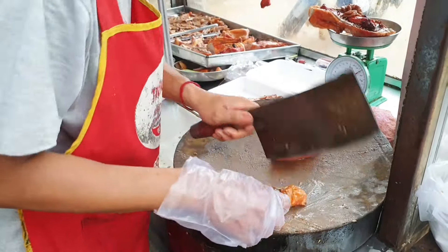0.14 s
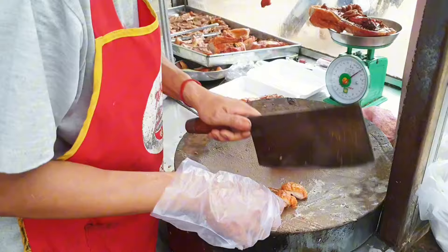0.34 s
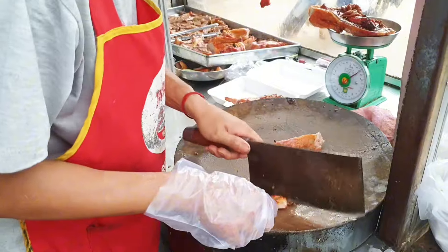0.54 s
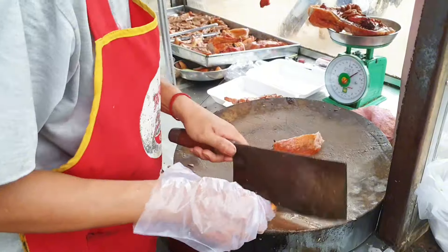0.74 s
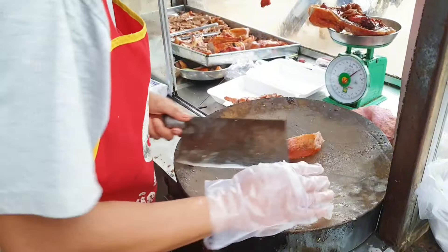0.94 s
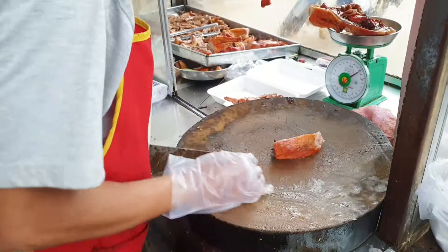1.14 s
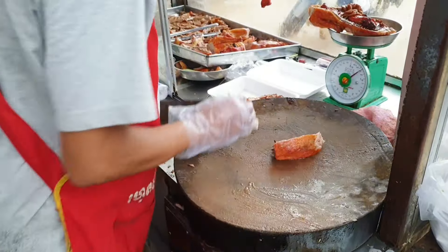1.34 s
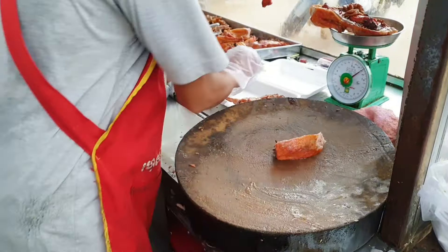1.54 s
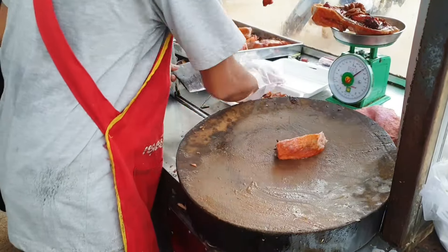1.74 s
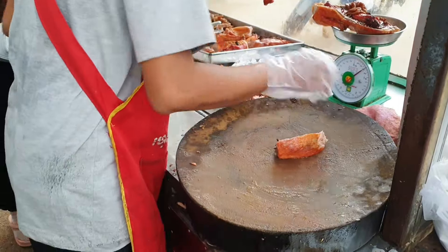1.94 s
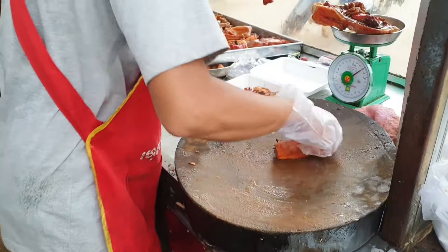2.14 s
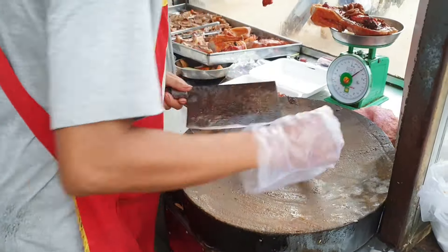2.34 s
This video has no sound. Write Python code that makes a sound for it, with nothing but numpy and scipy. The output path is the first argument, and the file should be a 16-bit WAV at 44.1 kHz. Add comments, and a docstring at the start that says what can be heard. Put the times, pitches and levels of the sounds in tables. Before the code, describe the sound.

Three solid cleaver chops crunch through roast meat on a thick wooden block, close up; then a scrape and plastic glove rustle, a brief clatter on a steel tray, and soft handling over low street rumble.

```python
"""A soft hollow tap and faint handling; a cleaver chops roast meat three times on a wooden block, close by.
A faint whistle; the blade scrapes the pieces up as a plastic glove rustles and snaps, to the end.
The cleaver clatters onto a steel tray and settles; two faint whistles follow.
Throughout: street rumble and hiss. Blows are modes and noise, the rest is shaped noise with a few modes.
The stall's walls give chops and clatter a short echo; the street gives the chops a long one."""
import sys
import numpy as np
from scipy import signal
from scipy.fft import rfft, irfft, next_fast_len
from scipy.io import wavfile
from scipy.ndimage import map_coordinates

SR = 44100
rng = np.random.default_rng(int(sys.argv[2]) if len(sys.argv) > 2 else 0)


def boost_factor(decibels):
    """Convert a level in decibels to a linear amplitude factor."""
    exponent = np.asarray(decibels, float) / 20
    return 10 ** exponent


def wav_record(signal):
    """Record a signal, one row per channel, as 16-bit PCM in the file named by sys.argv[1]."""
    frames = np.transpose(np.atleast_2d(signal))
    bounded = np.clip(frames, -1, 1)
    # unit amplitude maps onto the largest positive 16-bit level
    quanta = np.round(bounded * 32767).astype(np.int16)
    wavfile.write(sys.argv[1], SR, quanta)


N = 110250

# street noise spectrum: f/Hz, relative level/dB
STREET_SPECTRUM = [(18, -11), (30, -8), (104, 2.5), (160, -8.5), (420, -23), (1000, -24), (2000, -25),
                   (5440, -31.5), (8000, -33), (15800, -39.5)]
# left-right likeness of ambient sounds: f/Hz, likeness/1
AMBIENT_LIKENESS = [(60, 0.87), (250, 0.89), (700, 0.19), (2000, 0.045)]
# left-right likeness of the echoes: f/Hz, likeness/1
ECHO_LIKENESS = [(300, 0.87), (700, 0.53), (3000, 0.15)]
# faint narrow whistles: start/s, length/s, f/Hz, level/dB
WHISTLES_TABLE = [(0.85, 0.25, 2200, -56), (2.212, 0.045, 4020, -54), (2.235, 0.075, 2217, -54)]
# hand movements: peak/s, half-length scale/s, glove crinkle/dB, drag/dB, drag pitch/Hz
HAND_MOVES = [(0.928, 0.045, -47, -37.5, 430), (1.005, 0.022, -36.5, -53, 700),
              (1.06, 0.049, -42.5, -39, 230), (1.177, 0.072, -46.5, -49.5, 2200),
              (1.697, 0.043, -44, -44.5, 1850), (1.785, 0.047, -56, -48.5, 1390),
              (0.107, 0.027, -55.5, -53.5, 2200), (1.887, 0.019, -50.5, -55.5, 2200),
              (2.167, 0.1, -52, -45.5, 278), (2.379, 0.073, -48.5, -45, 2270)]
# thin plastic glove spectrum: f/Hz, relative level/dB
GLOVE_SPECTRUM = [(1500, -8), (3000, -14), (5200, -1), (8000, -10.5), (12000, -7.5), (16000, -24.5)]
# glove snaps: t/s, level/dB
GLOVE_SNAPS = [(1.4825, -35.5), (2.2643, -34.5), (2.4707, -38)]
# soft hollow taps: t/s, f/Hz, level/dB
HOLLOW_TAPS = [(0.085, 305, -36.5), (1.685, 717, -35.5), (2.478, 540, -39)]
# decay of the echo off the stall's walls: f/Hz, t60/s
STALL_DECAY = [(100, 0.8), (1000, 0.11), (10000, 0.34)]
# decay of the street's echo: f/Hz, t60/s
STREET_DECAY = [(100, 1.15), (10000, 1.09)]
# low modes of the stand under the block: f/Hz, level/dB, t60/s
STAND_MODES = [(67.1, -1.5, 0.35), (94.1, 5.5, 0.15), (141.5, -7, 0.45)]
# landings of the cleaver on the tray: t/s, level/dB, brightness/(dB/octave), rattle length scale/s
TRAY_LANDINGS = [(2.0756, -34.5, -0.5, 0.001), (2.1006, -24.5, -1, 0.0054), (2.1356, -29, 3.5, 0.036)]
# tray modes: f/Hz, level/dB, t60/s
TRAY_MODES = [(267, -3.5, 0.12), (650, 0, 0.12), (959.4, -6.5, 0.14), (1384, -2, 0.044), (2200, 1, 0.022),
              (2484, -6, 0.18), (2787, -2.5, 0.052), (3910, -5, 0.023), (5420, -18, 0.095)]
# chops: contact with wood/s, blow/dB, crust crunch/dB, pitch favoured by the struck spot/Hz,
# fall-off away from it/(dB/octave)
CHOP_BLOWS = [(0.2339, -12, -15.5, 290, 2), (0.493, -11.5, -21.5, 697, 1.72), (0.7283, -15.5, -7, 579, 3.5)]
# block modes: f/Hz, level/dB, t60/s
BLOCK_MODES = [(237.2, -16.5, 0.61), (274.2, 6, 0.056), (563, 6, 0.059), (663, -9, 0.16), (756, -30, 0.19),
               (963.3, -9, 0.19), (1237, -10, 0.087), (1500, -1.5, 0.068), (1646, 1, 0.034)]
# dense small modes of wood and blade: f/Hz, relative level/dB
KNOCK_SPECTRUM = [(88, -8), (150, -9), (566, -6), (888, -8), (1690, -13.5), (2020, -17), (16000, -31)]
# their decay: f/Hz, t60/s
KNOCK_DECAY = [(200, 0.26), (1000, 0.12), (12000, 0.12)]
# crust crunch spectrum: f/Hz, relative level/dB
CRUNCH_SPECTRUM = [(1500, -30), (2800, -24), (3950, 1), (9500, -4.5), (13800, -4), (16000, -7.5)]
# port imbalance: f/Hz, left over right/dB
PORT_BALANCE = [(60, -4.5), (700, -2), (4400, -7), (15000, 2)]
# port phase: f/Hz, left lead/rad
PORT_PHASE = [(500, -0.11), (4000, -1.71)]

STREET_DB, STALL_DB, FAR_DB = -40.5, -6, -13
WHISTLE_WIDTH_HZ, DRAG_WIDTH_OCTAVES = 80, 1  # both 1/e half-widths
CRINKLES_PER_S, CRINKLE_SPREAD_DB, WOBBLE_DB, TAP_T60_S = 2500, 2, 1.5, 0.07
STAND_PEAK_S = 0.03074  # modes pull together this long after the blow
TRAY_NOISE_DB, LANDING_DB = -2, -24
TRAY_ATTACK_S, TRAY_BRIGHT_TOP_HZ = 0.00016, 2780  # brightness tilt is flat above this pitch
SETTLE_S, SETTLE_T60_S = 2.174, 0.14
CRUNCH_S, KNOCK_DB, RING_ATTACK_S = 0.0045, 11, 0.00046
MODE_SCATTER_DB = 2
FLUTTER_STEP_RAD, FLUTTER_PER_S, FLUTTER_HZ = 0.35, 90, 600  # flutter grows above this pitch
PORT_DIP_HZ, PORT_DIP_DB, PORT_DIP_WIDTH_HZ = 8600, -5.5, 1500
TOP_HZ = 15950


def unit(x):
    """Scaled to rms 1."""
    return x / np.sqrt(np.mean(x ** 2) + 1e-20)


def along(points, hz):
    """Interpolates (Hz, value) points on a log axis."""
    f, v = np.transpose(points)
    return np.interp(np.log(hz + 1), np.log(f + 1), v)


def filtered(x, response):
    """x times a complex response of frequency."""
    m = next_fast_len(x.shape[-1] + 8192)
    spectrum = rfft(x, m) * response(np.fft.rfftfreq(m, 1 / SR))
    return irfft(spectrum, m)[..., :x.shape[-1]]


def coloured(x, spectrum):
    """x through a (Hz, dB) spectrum, rms 1."""
    return unit(filtered(x, lambda hz: boost_factor(along(spectrum, hz))))


def wobble(knots_per_s):
    """Smooth random curve."""
    knots = rng.standard_normal(int(N * knots_per_s / SR) + 4)
    return map_coordinates(knots, [np.arange(N) * knots_per_s / SR])


def dying(t60s, size, channels=1):
    """Noise whose every frequency dies at its own speed."""
    hz, t, z = signal.stft(rng.standard_normal((channels, size)), SR, nperseg=128)
    t60_s = np.maximum(along(t60s, hz), .01)[:, None]
    return signal.istft(z * boost_factor(-60 * t / t60_s), SR, nperseg=128)[1][:, :size]


def widen(pair, likeness=AMBIENT_LIKENESS):
    """Mixes two unrelated signals to the likeness of the two ports."""
    def mid_side(hz):
        turn = np.arccos(np.clip(along(likeness, hz), -1, 1)) / 2
        return np.array([np.cos(turn), np.sin(turn)])
    mid, side = filtered(pair, mid_side)
    return np.array([mid + side, mid - side])


def ring(modes, colour_db, t, attack_s):
    """One strike on decaying modes; levels scatter, uneven contact wavers the phase, pressure falls first."""
    total = 0
    for hz, db, t60 in modes:
        level_db = db + colour_db(hz) + MODE_SCATTER_DB * rng.normal()
        walk = np.cumsum(rng.standard_normal(100))
        waver = FLUTTER_STEP_RAD * np.interp(t * FLUTTER_PER_S, np.arange(100), walk)
        phase = 2 * np.pi * hz * t + waver * max(1, hz / FLUTTER_HZ) ** .5
        total = total + boost_factor(level_db - 60 * t / t60) * np.sin(phase)
    return -total * (1 - np.exp(-t / attack_s))


def add(track, s, x):
    """Lays x on the track at s seconds."""
    at = round(s * SR)
    track[at:at + len(x)] += x[:len(track) - at]


def street():
    """Lumpy traffic rumble under a smooth hiss: one noise split near 250 Hz, each part wavering by itself."""
    noise = coloured(rng.standard_normal((2, N)), STREET_SPECTRUM)
    rumble = filtered(noise, lambda hz: 1 / (1 + (hz / 250) ** 4))
    hiss = noise - rumble
    rumble_gain = boost_factor(0.49 * wobble(10.15) + 0.7 * wobble(0.92))
    hiss_gain = boost_factor(0.38 * wobble(6.0))
    return boost_factor(STREET_DB) * widen(rumble * rumble_gain + hiss * hiss_gain)


def echo(x, t60s, delay_s):
    """Diffuse reflections: decaying noise tails, drawn anew for each quarter second of sound."""
    out, step = np.zeros((2, N + 2 * SR)), SR // 4
    for at in range(step // 2, N, step):
        tail = dying(t60s, size=SR, channels=2)
        wet = signal.fftconvolve(x[None, at:at + step], tail / np.linalg.norm(tail[0]), axes=1)
        out[:, at + int(delay_s * SR):][:, :wet.shape[1]] += wet
    return widen(out[:, :N], ECHO_LIKENESS)


def whistles():
    """Narrow unsteady noise bands that swell and fade."""
    t = np.arange(N) / SR
    out = np.zeros((2, N))
    for s, length, centre_hz, db in WHISTLES_TABLE:
        swell = np.sin(np.pi * np.clip((t - s) / length, 0, 1)) ** .5
        band = filtered(rng.standard_normal((2, N)),
                        lambda hz: np.exp(-((hz - centre_hz) / WHISTLE_WIDTH_HZ) ** 2))
        out += boost_factor(db) * swell * boost_factor(2 * WOBBLE_DB * wobble(39.66)) * widen(unit(band))
    return out


def glove_crinkle(swells):
    """Thin plastic buckles in dense random clicks over a rustle."""
    hits = rng.random((2, N)) < CRINKLES_PER_S / SR
    sizes = boost_factor(CRINKLE_SPREAD_DB * rng.exponential(size=(2, N)))
    clicks = hits * sizes * rng.choice([-1, 1], (2, N))
    rustle = coloured(unit(clicks) + rng.standard_normal((2, N)), GLOVE_SPECTRUM)
    return swells.sum(0) * boost_factor(WOBBLE_DB * wobble(54.4)) * rustle


def drag(swells, pitches_hz):
    """Rubbing: a noise band about each movement's own pitch."""
    rub = rng.standard_normal((2, N))
    out = np.zeros((2, N))
    for swell, centre_hz in zip(swells, pitches_hz):
        band = filtered(rub, lambda hz: np.exp(-(np.log2((hz + 1) / centre_hz) / DRAG_WIDTH_OCTAVES) ** 2))
        out += swell * unit(band)
    return boost_factor(WOBBLE_DB * wobble(28.72)) * out


def snaps_and_taps():
    """Snaps are short bursts of glove noise; each tap rings one mode."""
    out, t = np.zeros(N), np.arange(SR // 4) / SR
    for s, db in GLOVE_SNAPS:
        burst = coloured(rng.standard_normal(900), GLOVE_SPECTRUM)
        add(out, s, boost_factor(db - 60 * t[:900] / 0.011) * burst)
    for s, hz, db in HOLLOW_TAPS:
        add(out, s, ring([(hz, db, TAP_T60_S)], lambda hz: 0, t, attack_s=0.004))
    return out


def hands():
    """Each movement swells quickly and fades slower, driving crinkle and drag; snaps and taps stand apart."""
    t = np.arange(N) / SR
    s, half, glove_db, drag_db, drag_hz = np.transpose(HAND_MOVES)[:, :, None]
    swell = np.exp(-((t - s) / half / np.where(t < s, .7, 1.3)) ** 2)
    moving = glove_crinkle(boost_factor(glove_db) * swell) + drag(boost_factor(drag_db) * swell, drag_hz)
    return widen(moving) + snaps_and_taps()


def thump(t):
    """The stand's low modes swell, peak together and beat."""
    late = t - STAND_PEAK_S
    modes = sum(boost_factor(db - 60 * t / t60) * np.cos(2 * np.pi * hz * late) for hz, db, t60 in STAND_MODES)
    return np.clip(t / STAND_PEAK_S, 0, 1) ** 2 * modes


def clanks():
    """Each landing is a short rattle of contacts that rings the tray; the last also shakes the stand."""
    out, t = np.zeros(N), np.arange(SR // 3) / SR
    for s, db, tilt_db, length in TRAY_LANDINGS:
        contacts = rng.standard_normal(2500) * (rng.random(2500) < .03)
        rattle = np.exp(-(t[:2500] / length) ** 4) * contacts
        rattle[0] = 3  # sure first contact
        colour_db = lambda hz: tilt_db * np.log2(min(hz, TRAY_BRIGHT_TOP_HZ) / 500)
        body = ring(TRAY_MODES, colour_db, t, TRAY_ATTACK_S)
        spectrum = [(hz, level + colour_db(hz)) for hz, level in KNOCK_SPECTRUM]
        body += boost_factor(TRAY_NOISE_DB - 60 * t / 0.16) * coloured(rng.standard_normal(len(t)), spectrum)
        add(out, s, boost_factor(db) * signal.fftconvolve(rattle / np.linalg.norm(rattle), body))
    add(out, TRAY_LANDINGS[-1][0], boost_factor(LANDING_DB) * thump(t))
    return out


def chops():
    """Edge crunches the crust, meets the wood; the stand thumps late; the street throws back a wash."""
    blows, bare, t = np.zeros(N), np.zeros((2, N)), np.arange(SR) / SR
    for s, db, crunch_db, spot_hz, fall_db in CHOP_BLOWS:
        colour_db = lambda hz: -fall_db * np.minimum(abs(np.log2((hz + 1) / spot_hz)), 2)
        spot_level_db = along(KNOCK_SPECTRUM, spot_hz)
        shape = lambda hz: boost_factor(along(KNOCK_SPECTRUM, hz) - spot_level_db + colour_db(hz))

        crunch_swell = (t / CRUNCH_S) ** 2 * np.exp(-(t / CRUNCH_S) ** 3)
        crunch = coloured(rng.standard_normal((2, len(t))), CRUNCH_SPECTRUM)
        crunch = boost_factor(crunch_db) * crunch * crunch_swell

        knock = dying(KNOCK_DECAY, size=len(t))[0]
        knock = filtered(knock / knock[:441].std(), shape) * (1 - np.exp(-t / RING_ATTACK_S))
        block = ring(BLOCK_MODES, colour_db, t, RING_ATTACK_S)
        add(blows, s, boost_factor(db) * (block + boost_factor(KNOCK_DB) * knock + boost_factor(-fall_db / 2) * thump(t)))

        wash = dying(STREET_DECAY, size=len(t), channels=2)
        wash = widen(filtered(wash / wash[:, :441].std(), shape), ECHO_LIKENESS)
        wash = wash * (1 - np.exp(-t / 0.0068))
        for track, tail, crackle in zip(bare, wash, crunch):
            add(track, s, boost_factor(db + KNOCK_DB + FAR_DB) * tail)
            add(track, s - CRUNCH_S, crackle)  # crust breaks before the wood is met
    return blows, bare


def scene():
    """Near blows with their echoes, hands, whistles and street."""
    blows, bare = chops()
    hits = blows + clanks()
    # the cleaver lies flat and damps the tray; the fade covers all hits and their stall echo
    settle = boost_factor(-60 * np.clip(np.arange(N) / SR - SETTLE_S, 0, None) / SETTLE_T60_S)
    near = (hits + boost_factor(STALL_DB) * echo(hits, STALL_DECAY, delay_s=0.0056)) * settle
    return near + bare + hands() + whistles() + street()


def band_limit(x):
    """A steep low-pass at the top of the band."""
    return signal.sosfilt(signal.butter(12, 16660, fs=SR, output="sos"), x)


def record(dry):
    """Two phone ports differ in level and phase and share a treble dip; soft clip, band limit."""
    half = lambda hz: boost_factor(along(PORT_BALANCE, hz) / 2) * np.exp(.5j * along(PORT_PHASE, hz))
    dip = lambda hz: boost_factor(PORT_DIP_DB * np.exp(-((hz - PORT_DIP_HZ) / PORT_DIP_WIDTH_HZ) ** 2))
    ports = filtered(dry, lambda hz: dip(hz) * np.array([half(hz), 1 / half(hz)]))
    clipped = ports / (1 + abs(ports / .93) ** 6) ** (1 / 6)
    mix = filtered(clipped, lambda hz: hz < TOP_HZ)
    return band_limit(mix)


dry = scene()
out = record(dry)
wav_record(out)
```